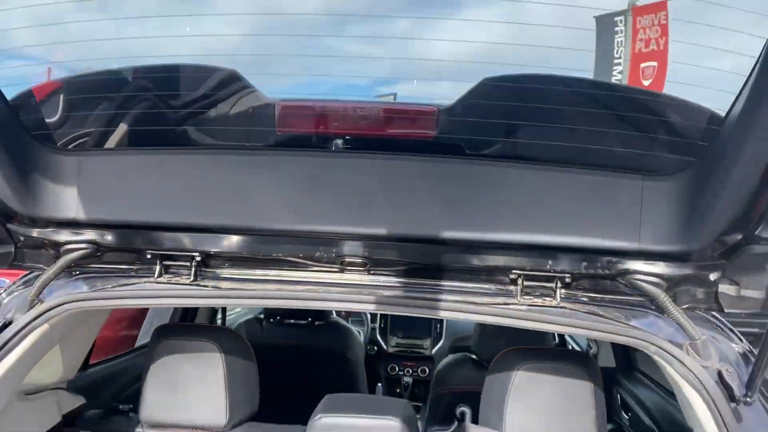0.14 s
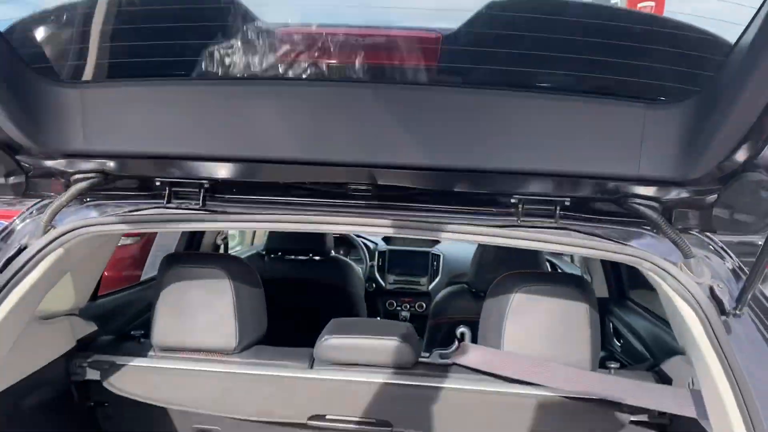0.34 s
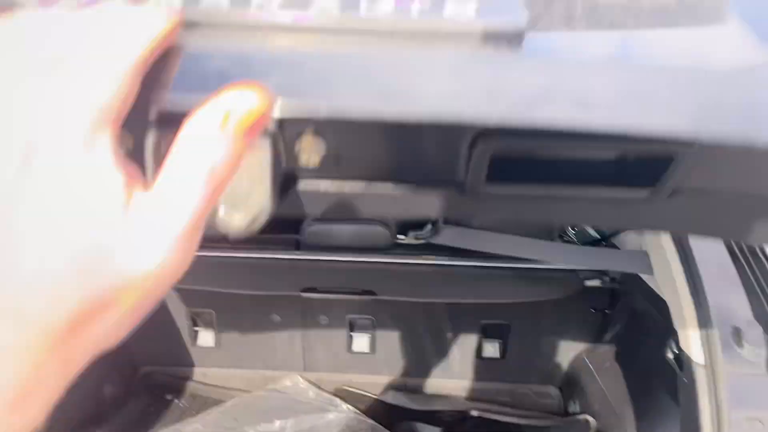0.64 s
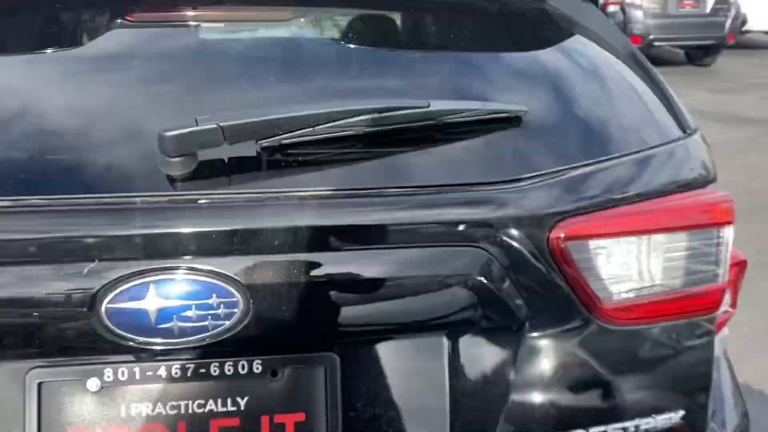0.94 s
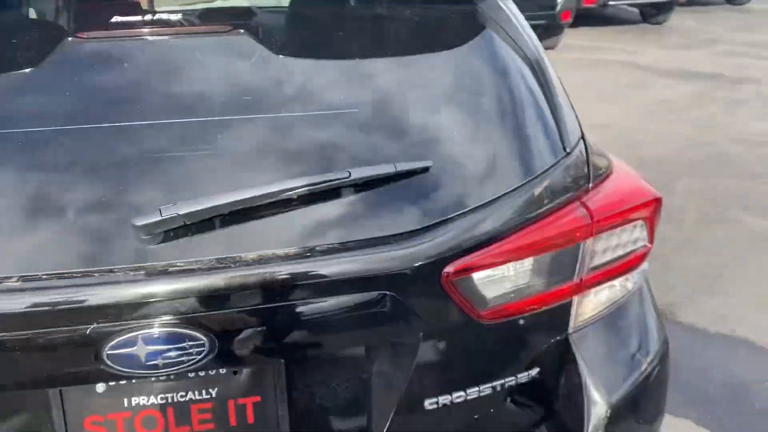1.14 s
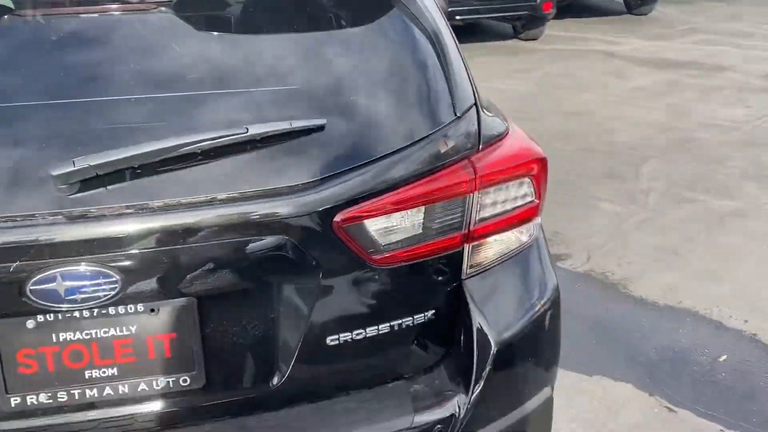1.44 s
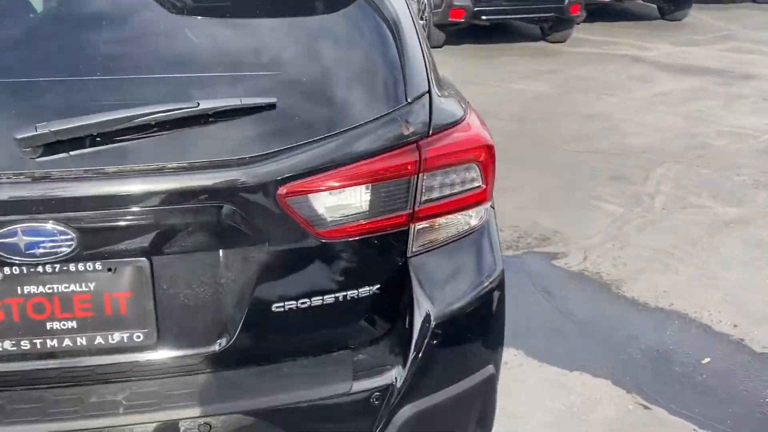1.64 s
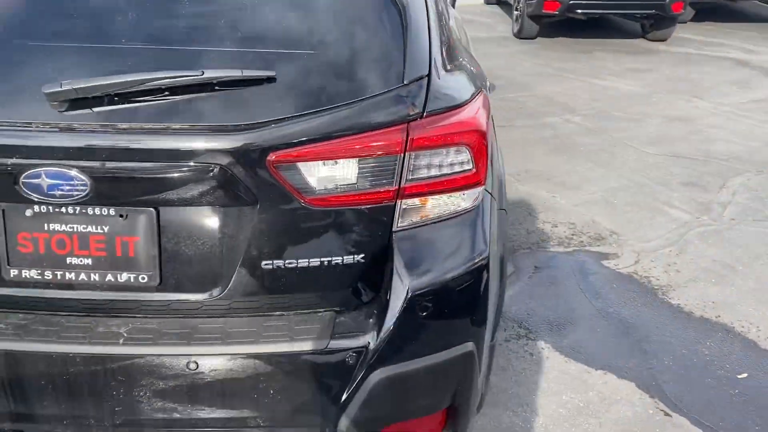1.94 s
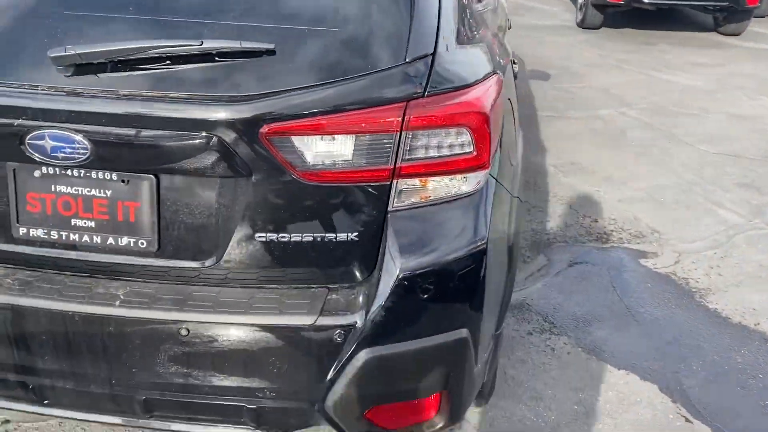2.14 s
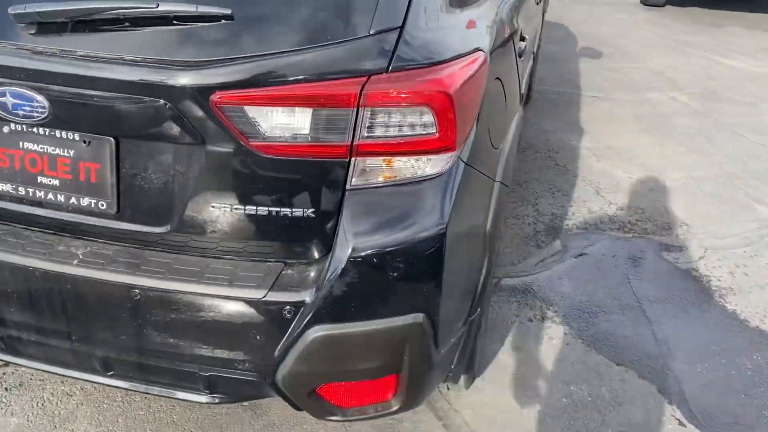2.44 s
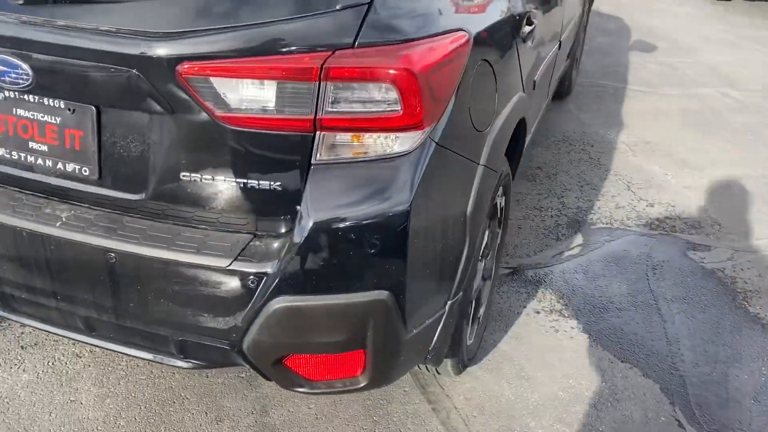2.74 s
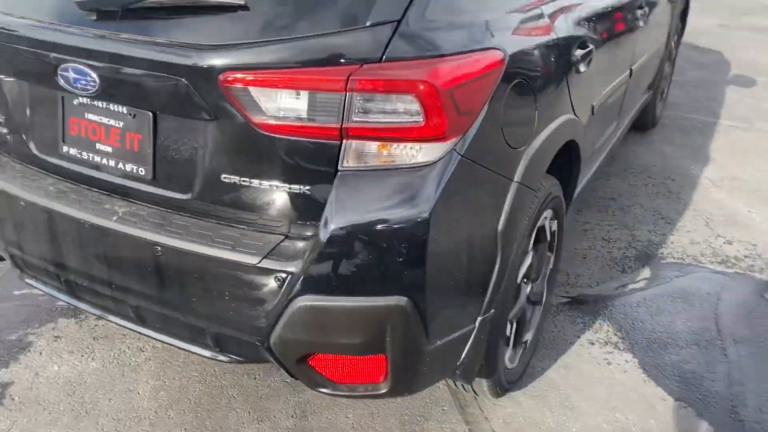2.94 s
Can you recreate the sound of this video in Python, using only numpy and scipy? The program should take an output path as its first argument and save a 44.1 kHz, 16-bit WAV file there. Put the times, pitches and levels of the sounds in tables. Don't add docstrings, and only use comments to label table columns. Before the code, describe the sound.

Loud uneven wind noise rumbles and crackles on the microphone beside a parked car outdoors.

```python
import sys
import numpy as np
from scipy import signal
from scipy.fft import rfft, irfft, next_fast_len
from scipy.io import wavfile
from scipy.ndimage import uniform_filter1d, minimum_filter1d, map_coordinates

SR = 44100
rng = np.random.default_rng(int(sys.argv[2]) if len(sys.argv) > 2 else 0)


def ratio(d):
    e = np.asarray(d, float) / 20
    return 10 ** e


def dump_mix(stems):
    frames = np.atleast_2d(stems).T
    limited = np.clip(frames, -1, 1)
    pcm = np.round(limited * 32767).astype(np.int16)
    wavfile.write(sys.argv[1], SR, pcm)


N = 136710

# frequency in Hz, likeness from 0 to 1.
WIND_COHERENCE = [(60, 0.98), (250, 0.79), (700, 0.72), (2000, 0.48)]
# time in seconds, crack peak in dB, push over crack in dB.
SNAPS = [(0.1144, -42, 19.5), (0.1263, -27, 11), (0.151, -53, 13), (0.1856, -40, 19.5), (0.4814, -32, 9.5),
         (0.4868, -25.5, 10), (0.4948, -25, 9.5), (0.5168, -35, 13.5), (0.582, -42, 9), (0.638, -22.5, 23),
         (0.6594, -22.5, 14), (0.7066, -25.5, 18), (0.7234, -31, 14.5), (0.7352, -25.5, 9),
         (0.7497, -8.5, 20.5), (0.7583, -27.5, 14), (0.7658, -20, 5.5), (0.7797, -22.5, 12),
         (0.7996, -28.5, 18.5), (0.8425, -40.5, 21), (0.8576, -38.5, 17.5), (0.873, -47, 12),
         (0.8766, -29, -7), (0.8976, -29.5, 16.5), (0.9193, -37, 12), (0.9667, -20.5, 10.5),
         (0.976, -33.5, 20.5), (1.0042, -28.5, 22), (1.0276, -29, 12), (1.0451, -27, 12), (1.054, 6, 14.5),
         (1.0889, 16, -12.5), (1.1409, -21, 12), (1.1636, -24, 14), (1.18, -30, 23.5), (1.1965, -23, 21.5),
         (1.8277, -27, 8), (1.8422, -18, 22), (1.8709, -18.5, 9.5), (1.9632, -18.5, 22.5),
         (1.9897, -16, 18.5), (2.0058, -18, 16.5), (2.02, -13, 20), (2.0388, 2.5, -1.5), (2.0976, -24, 10),
         (2.1151, -20, 17), (2.1605, -21.5, 11.5), (2.2102, -16, 17), (2.2677, -24.5, 17.5),
         (2.336, -11, 13.5), (2.385, -21.5, -4), (2.4309, -23, 7), (2.4793, -26, -7.5), (2.5972, -27, 10),
         (2.7262, -24.5, 20), (2.7452, -28.5, 10), (2.803, -45, 18), (2.822, -25, 12), (2.8401, -32, 10.5),
         (2.8819, -29, 2.5)]
# frequency in Hz, level in dB per Hz.
DULL_CRACK = [(500, -13), (1100, -0.5), (2200, -11), (3500, -22), (6000, -51)]


def unit(x):
    return x / np.sqrt(np.mean(x ** 2) + 1e-20)


def along(points, hz):
    f, v = np.transpose(points)
    return np.interp(np.log(hz + 1), np.log(f + 1), v)


def curves(rows):
    s, *cols = np.transpose(rows)
    return [np.interp(np.arange(N) / SR, s, c) for c in cols]


def wobble(rate):
    knots = rng.standard_normal(2000)
    return map_coordinates(knots, [np.arange(N) * min(rate, 600) / SR])


def filtered(x, response):
    m = next_fast_len(N + SR // 2)
    return irfft(rfft(x, m) * response(np.fft.rfftfreq(m, 1 / SR)), m)[..., :N]


def colour(points):
    (lo, first), (hi, last) = points[0], points[-1]
    closed = [(lo / 2, first - 40)] + list(points) + [(hi * 2, last - 60)]
    return lambda hz: ratio(along(closed, hz))


def pair(spectrum, alike):
    # frequency in Hz, phase in radians.
    left_phase = [(0, 0), (1200, -1.9), (2500, -6.3), (8350, -15.71), (9560, -15.71), (10300, -18.85),
                  (11800, -18.85), (12450, -21.99), (13900, -21.99), (14600, -25.13)]

    def mid_side_gain(hz):
        turn = np.arccos(np.clip(along(alike, hz), -1, 1)) / 2
        return colour(spectrum)(hz) * np.array([np.cos(turn), np.sin(turn)])

    def lag(hz):
        half_phase = np.interp(hz, *np.transpose(left_phase)) / 2
        return np.exp(1j * half_phase * np.array([[1], [-1]]))

    mid, side = filtered(rng.standard_normal((2, N)), mid_side_gain)
    return unit(filtered(np.array([mid + side, mid - side]), lag))


def bumps(rows):
    rise_share = 0.075
    t, env = np.arange(N) / SR, np.zeros(N)
    for s, db, length in rows:
        near = slice(max(round(s * SR), 0), round((s + .15) * SR))
        u = np.abs(t[near] - s) / max(length, .0004)
        env[near] += ratio(db) * (1 - np.exp(-u / rise_share)) * np.exp(-u)
    return env


def ticks(drive, spectrum):
    cracks_per_s, spread = 1100, 0.36
    chance, size = rng.random((2, N))
    sizes = (-np.log(size * .99 + 1e-3)) ** spread * rng.standard_normal(N)
    train = (chance < cracks_per_s / SR) * sizes + 0.016 * rng.standard_normal(N)
    gain = colour(spectrum)
    return filtered(drive * train, gain) / np.std(filtered(train, gain))


def traffic():
    # time in seconds, hum level in dB, tyre hiss over it in dB.
    hum_levels = [(0, -66.5, 0.5), (.25, -73, 1), (.45, -66.5, 6), (.65, -72.5, 7.5), (.9, -72.5, 0.5),
                  (1.22, -80, -5), (1.36, -68.5, -1), (1.8, -69, 0.5), (2.1, -65, -8.5), (2.35, -72.5, -4.5),
                  (2.55, -78, -16), (3.1, -84.5, -11.5)]
    # frequency in Hz, level in dB per Hz.
    hum_spectrum = [(200, -4), (900, 5.5), (1400, 2.5), (2600, -2.5), (3000, -12.5), (5300, -17.5),
                    (6500, -31)]
    tyre_spectrum = [(6800, -5.5), (8000, 2), (11000, -5.5), (15500, -9.5)]
    hum_db, tyres_db = 25.5, -23
    level_db, hiss_db = curves(hum_levels)
    hum = pair(hum_spectrum, [(500, 0.21), (4500, 0.054)])
    hum = hum * ratio(0.58 * wobble(11)) * ratio([[1.2], [-1.2]])
    hiss = pair(tyre_spectrum, [(6000, .5), (8300, .995)])
    hiss = hiss * ratio(tyres_db + hiss_db + 1.5 * wobble(12))
    return ratio(level_db + hum_db) * (hum + hiss)


def rumble():
    # time in seconds, swing level in dB, quick swings over slow in dB.
    swell = [(0, -35, -2.5), (.15, -19.5, -8), (.39, -36, -3.5), (.5, -12, 0.5), (.59, -14.5, -1.5),
             (.77, -13.5, -20), (.81, -24.5, 0), (.88, -13, -12), (.95, -29, -4), (1.01, -16.5, -6),
             (1.34, -17, -4.5), (1.38, -22, -24), (1.6, -40, -25), (1.65, -20, -3), (1.78, -27, -0.5),
             (1.84, -16, -1.5), (2.88, -20.5, 1.5), (3.1, -33.5, -14)]
    # frequency in Hz, level in dB per Hz.
    slow_spectrum = [(25, -22), (45, 2.5), (70, 9), (110, 2.5), (180, -21), (400, -69.5)]
    quick_spectrum = [(70, -33.5), (120, 9.5), (180, 4.5), (280, -1), (500, -42.5)]
    level_db, quick_db = curves(swell)
    slow = ratio(level_db + wobble(21)) * pair(slow_spectrum, WIND_COHERENCE)
    quick = ratio(level_db + quick_db + 2 * wobble(29.18)) * pair(quick_spectrum, WIND_COHERENCE)
    return slow + quick


def lumps():
    return 2.96 * wobble(60) + 3 * wobble(220)


def eddies(lumps_db):
    # time in seconds, eddy level in dB.
    gust = [(0, -45.5), (.14, -14.5), (.22, -33.5), (.4, -43.5), (.5, -14.5), (.55, -16.5), (.66, -11),
            (.69, -12), (.76, -15), (.79, -37.5), (.9, -15), (.915, -35), (1.05, -21.5), (1.22, -28),
            (1.36, -63.5), (1.79, -39), (1.83, -16), (2.65, -14.5), (2.99, -27), (3.02, -39)]
    # time in seconds, peak in dB, length in seconds.
    puffs = [(0.098, -3, 0.0017), (0.121, -10, 0.016), (0.317, -22.5, 0.024), (0.269, -26, 0.0063),
             (0.411, -13, 0.0088), (0.562, -18.5, 0.0086), (0.95, -13, 0.0033), (1.108, -12, 0.008),
             (1.25, -25, 0.02), (2.116, -6.5, 0.014), (2.478, -3.5, 0.012), (2.973, -23.5, 0.0033),
             (0.438, -10, 0.0076), (0.487, 2.5, 0.014), (0.636, -0.5, 0.015), (0.71, -3.5, 0.005),
             (0.749, 3, 0.011), (0.79, -15, 0.02), (0.843, -10.5, 0.011), (0.862, -21.5, 0.0087),
             (0.967, 7.5, 0.0022), (1.013, -6.5, 0.019), (1.14, -8.5, 0.0031), (1.168, -8.5, 0.004),
             (1.196, -7.5, 0.0029), (1.291, -17.5, 0.02), (1.328, -15, 0.0029), (1.83, -5, 0.0072),
             (1.98, -11.5, 0.043), (2.141, -18, 0.11), (2.272, -5, 0.0095), (2.38, -10, 0.023),
             (2.516, -7, 0.0073), (2.73, -8.5, 0.0085), (2.88, -10.5, 0.011)]
    # frequency in Hz, level in dB per Hz.
    eddy_spectrum = [(100, -7.5), (220, -2.5), (400, -3.5), (800, -6.5), (1300, -15), (2200, -28.5),
                     (3500, -49), (8000, -69)]
    bed_db, puff_db, puff_rough_db, push_s = -2.5, -6, 2.5, 0.0018
    gust_db, = curves(gust)
    strength = ratio(gust_db + bed_db + lumps_db)
    strength = strength + ratio(puff_db) * bumps(puffs) * ratio(puff_rough_db * wobble(200))
    strength = strength + bumps([(s, db + push_db, push_s) for s, db, push_db in SNAPS])
    raw = pair([(40, 0), (11000, 0)], WIND_COHERENCE)
    gain = colour(eddy_spectrum)
    body = filtered(strength * raw, gain) / np.std(filtered(raw, gain))
    return body * ratio([[.4], [-.4]])


def crackle(lumps_db):
    # start in seconds, length in seconds, level in dB.
    flurries = [(0.1, 0.011, -56), (0.485, .04, -43.5), (0.537, 0.086, -56.5), (0.631, 0.042, -39.5),
                (0.703, 0.021, -43), (.745, 0.022, -38.5), (0.882, .03, -62.5), (1.035, 0.0084, -27),
                (1.046, 0.069, -27.5), (1.162, 0.027, -38.5), (1.864, 0.021, -36.5), (1.92, 0.025, -56.5),
                (1.96, 0.084, -27), (2.073, 0.025, -37.5), (2.137, 0.083, -27), (2.231, 0.1, -35.5),
                (2.309, 0.031, -33.5), (2.372, 0.066, -26), (2.474, 0.015, -27), (2.504, 0.11, -34),
                (2.582, 0.067, -30.5), (2.661, .016, -34.5), (2.681, 0.027, -39), (2.733, 0.023, -27),
                (2.779, 0.0087, -45), (2.788, .07, -55), (2.875, 0.032, -37), (2.929, 0.026, -47)]
    # frequency in Hz, level in dB per Hz.
    crack_spectrum = [(600, 20), (1300, -3.5), (2500, 4), (4000, -0.5), (5500, -4.5), (7600, -23),
                      (8600, -53.5), (12000, -52.5)]
    edge_s, crack_db, dull_db = 0.0065, 5.5, 1.5
    grows = 0.53
    t, tearing = np.arange(N) / SR, np.zeros(N)
    for s, length, db in flurries:
        outside_s = np.clip(np.abs(t - s - length / 2) - length / 2, 0, 1)
        tearing += ratio(db) * np.exp(-outside_s / edge_s)
    drive = tearing * ratio(crack_db + grows * lumps_db)
    flicker_db = np.minimum(4 * wobble(45), 2)
    bright = ticks(drive * ratio(flicker_db), crack_spectrum)
    return bright + ratio(dull_db) * ticks(drive, DULL_CRACK)


def snaps():
    # frequency in Hz, level in dB per Hz.
    snap_spectrum = [(400, -17), (1200, 5.5), (3000, 2), (5500, -5.5), (7800, -25.5), (9000, -34),
                     (13000, -50.5)]
    bright_db, dull_db = 10, 15.5
    length_s, lag_s = .0007, .002
    bright_grows, loud_db = .4, -16
    burst = rng.choice([-1., 1.], N)

    def snap(grows, gain):
        rows = [(s + lag_s, db + grows * (db - loud_db), length_s) for s, db, _ in SNAPS]
        return filtered(bumps(rows) * burst, gain) / np.std(filtered(burst, gain))

    bright = ratio(bright_db) * snap(bright_grows, colour(snap_spectrum))
    return bright + ratio(dull_db) * snap(0, colour(DULL_CRACK))


def thuds():
    # centre in seconds, pitch in Hz, peak in dB.
    vortices = [
        (0.491, 156, -8.5),
        (0.761, 111.4, -5),
        (1.087, 117, -14.5),
        (1.332, 106, -15),
        (1.813, 157, -3.5),
        (2.125, 158, -7),
        (2.396, 149, -2.5),
        (2.733, 170, -11.5),
        (2.979, 440, -15),
    ]
    swings = 1.24
    t = np.arange(N) / SR
    phase = rng.random((len(vortices), 1)) * 2 * np.pi
    s, hz, db = np.transpose(vortices)[:, :, None]
    envelope = ratio(db) * np.exp(-((t - s) * hz / swings) ** 2)
    return np.sum(envelope * np.sin(2 * np.pi * hz * (t - s) + phase), axis=0)


def seal():
    # time in seconds, level in dB.
    squeeze = [(1.05, -95), (1.054, -48), (1.062, -33), (1.068, -39), (1.075, -33), (1.099, -44),
               (1.101, -29), (1.108, -42), (1.18, -72)]
    # frequency in Hz, level in dB per Hz.
    hiss_spectrum = [(1500, -12.5), (1750, 6.5), (2400, -13), (4300, -11.5), (8000, -16.5), (15500, -24.5)]
    seal_db, rough_db = 15.5, 2.5
    level_db, = curves(squeeze)
    strength = ratio(level_db + rough_db * wobble(300)) * ratio(seal_db)
    return strength * pair(hiss_spectrum, [(2000, .8), (7000, .96)])


def scene():
    lumps_db = lumps()
    left_only = ratio([[0], [-27]])
    wind = rumble() + eddies(lumps_db) + (crackle(lumps_db) + snaps()) * left_only
    return traffic() + wind + thuds() + seal()


def roll_off(x):
    return signal.sosfilt(signal.butter(12, 16520, fs=SR, output="sos"), x)


def record(dry):
    limit, hold_s, top_hz = .92, 0.0026, 15830
    span = round(hold_s * SR)
    need = np.minimum(1, limit / (np.abs(dry).max(axis=0) + 1e-9))
    gain = uniform_filter1d(minimum_filter1d(need, span), span // 2)
    return roll_off(filtered(dry * gain, lambda hz: hz < top_hz))


dry = scene()
out = record(dry)
dump_mix(out)
```